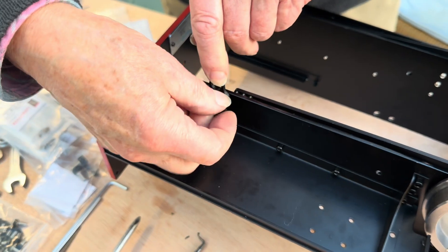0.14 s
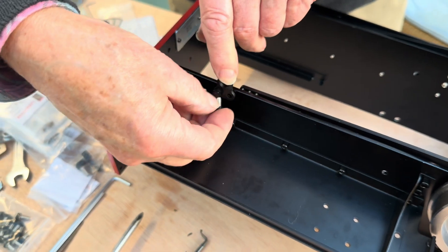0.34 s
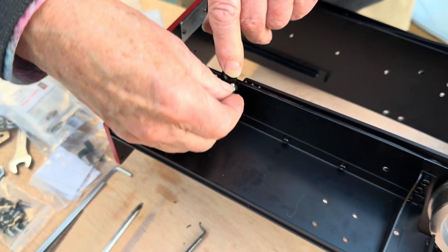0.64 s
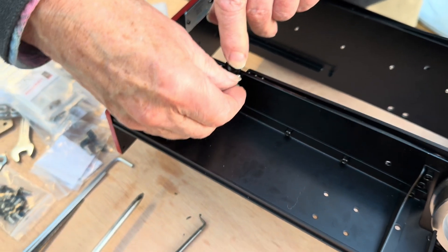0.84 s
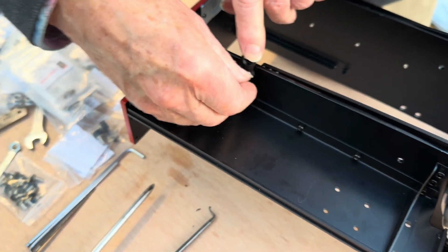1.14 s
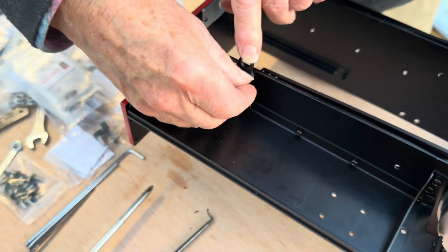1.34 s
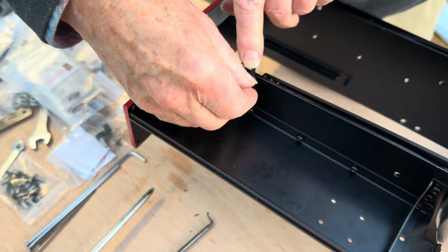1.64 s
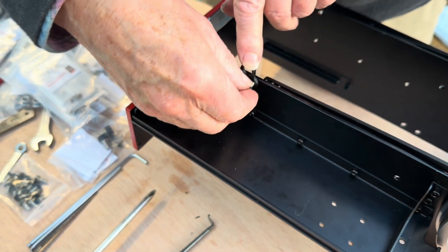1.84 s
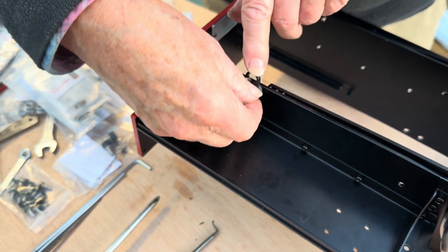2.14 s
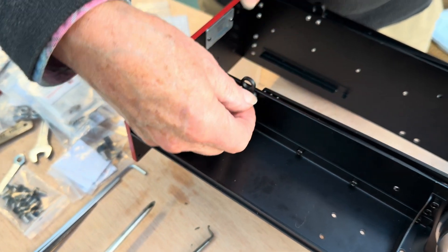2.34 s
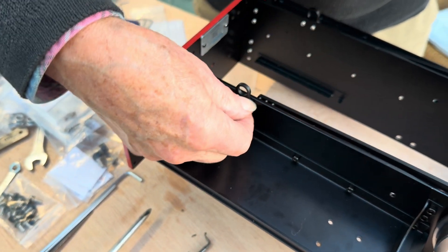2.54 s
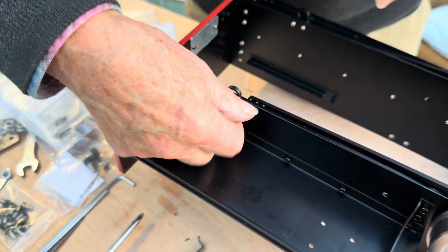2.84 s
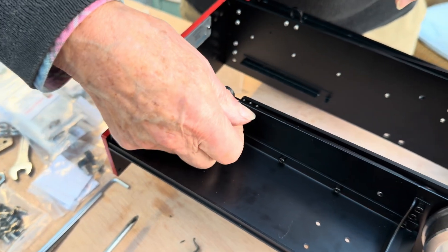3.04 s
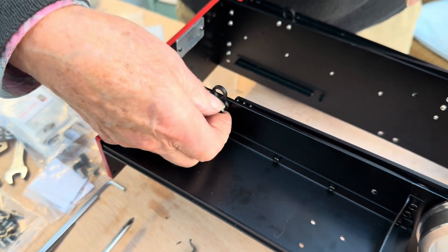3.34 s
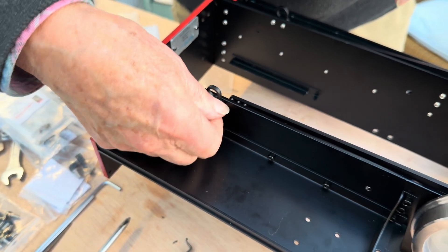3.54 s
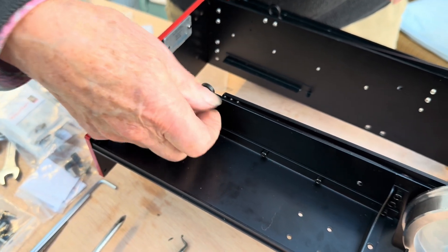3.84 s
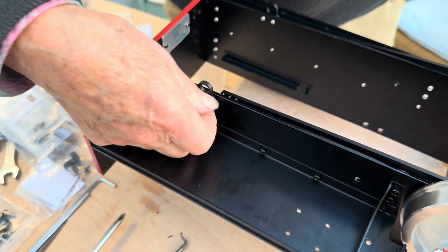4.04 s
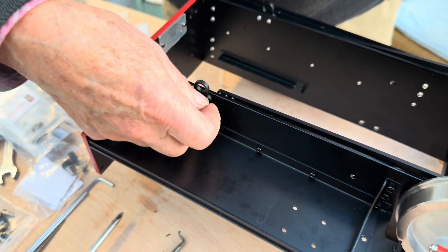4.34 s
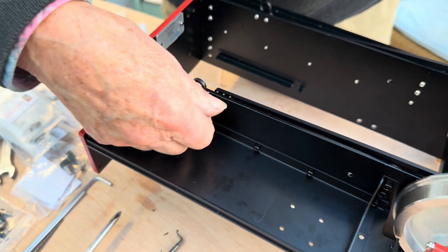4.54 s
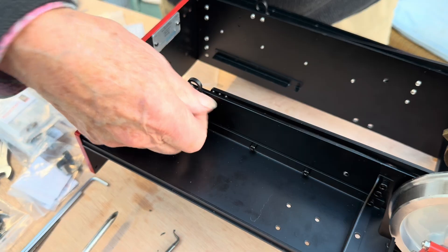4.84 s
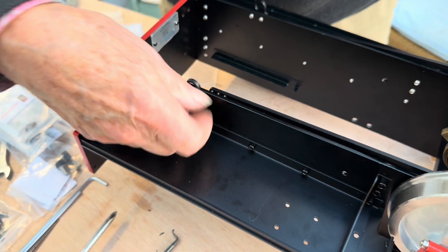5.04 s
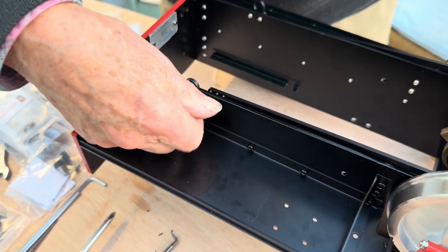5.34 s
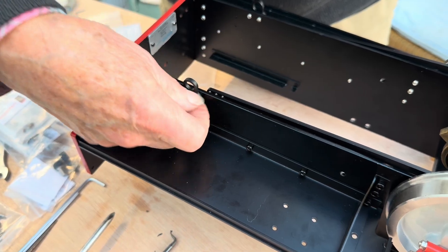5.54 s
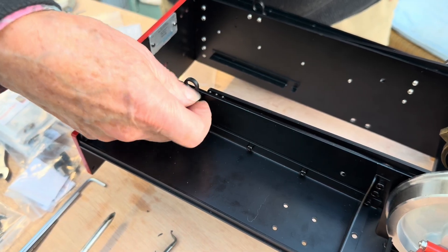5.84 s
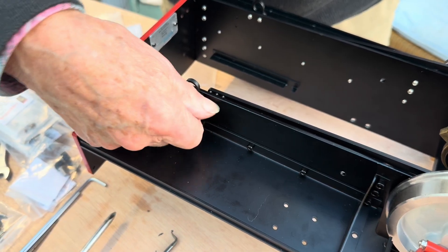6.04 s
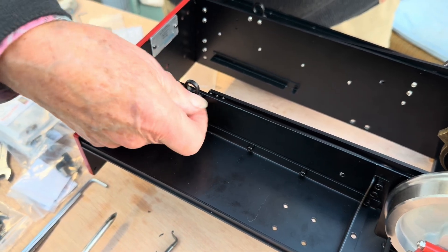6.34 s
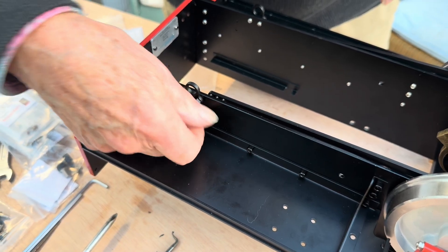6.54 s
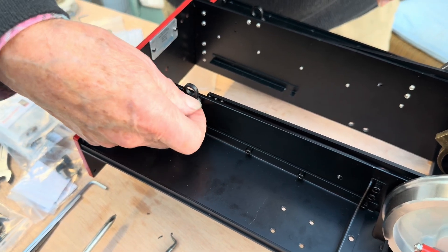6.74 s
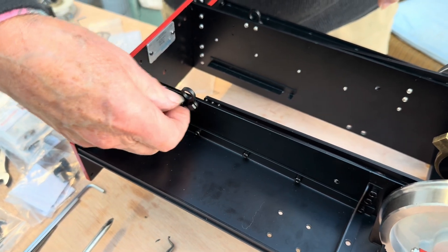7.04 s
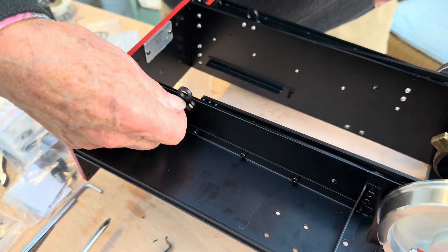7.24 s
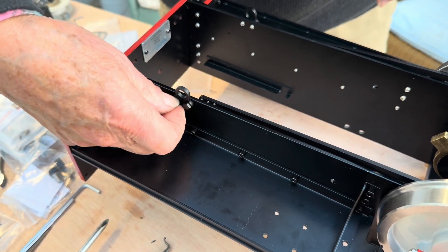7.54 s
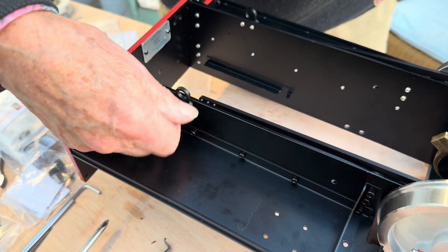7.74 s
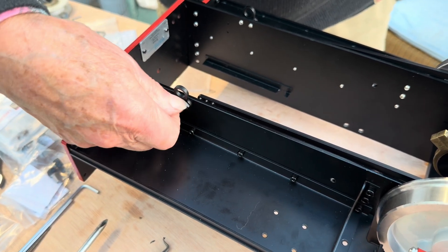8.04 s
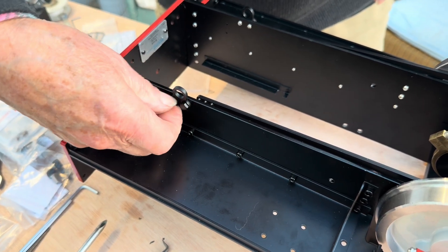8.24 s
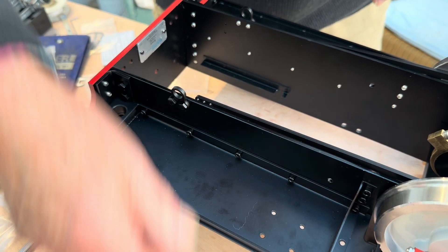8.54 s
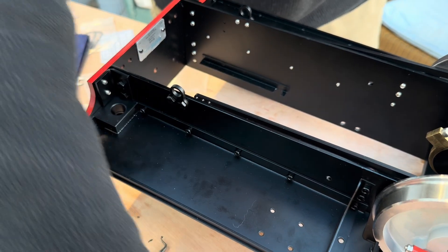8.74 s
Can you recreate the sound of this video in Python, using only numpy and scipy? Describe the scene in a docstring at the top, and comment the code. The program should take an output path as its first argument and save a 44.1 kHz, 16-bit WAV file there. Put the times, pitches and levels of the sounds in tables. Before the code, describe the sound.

A loose metal fitting clinks unevenly against a sheet-steel frame while a nut is tightened by hand, ending with a soft sleeve brush.

```python
"""A workbench in a quiet workshop, a phone's two microphones close to a sheet-steel frame.
Fingers turn a nut onto a bolt, and a loose metal fitting knocks at each turn and rings the frame.
Between knocks the thread scrapes, the nut ticks and the fingers hiss as they slide to a new grip.
The hands bump the frame softly, and at the end a sleeve brushes past the microphones.
Low room rumble and faint microphone hiss lie underneath."""
import sys
import numpy as np
from scipy import signal
from scipy.fft import rfft, irfft, next_fast_len
from scipy.io import wavfile
from scipy.ndimage import uniform_filter1d

SR = 44100
rng = np.random.default_rng(int(sys.argv[2]) if len(sys.argv) > 2 else 0)


def waveform_to_disk(signal):
    """Save audio, clipped to [-1, 1], as 16-bit WAV at the path in sys.argv[1]."""
    frames = np.transpose(np.atleast_2d(signal))
    scaled = np.clip(frames, -1, 1) * 32767
    samples = np.round(scaled).astype(np.int16)
    wavfile.write(sys.argv[1], SR, samples)


N = 392798
TIME = np.arange(N) / SR
RING_SAMPLES, CONTACT_SAMPLES = 32768, 1024
MIC_LAG_S = np.array([[0], [5.6e-5]])  # left, right: the right microphone is further from the bolt

# Knocks of the fitting: start_s, level_db, hardness_db_per_octave, weight_db, rim_clink_db
# (0 in the last three is an ordinary knock)
FITTING_KNOCKS = [(0.166, -61, 14.5, 0, -8), (0.5322, -43, -4.5, 6.5, -2), (0.9707, -37, -10, 3, 0),
                  (1.139, -35, -6, 4, -1), (1.1641, -37, -10.5, 4, -1), (1.1938, -38, -6, 4, -1),
                  (1.6665, -52, 3.5, 7, 4.5), (2.1118, -24.5, 4.0, 6, -3), (2.175, -25, -1.5, -1, -2),
                  (2.2782, -46, -8.5, 12.5, -2), (2.367, -44.5, -5, 13.5, -2.5), (2.511, -54, -8.5, 8, -8),
                  (2.5463, -35.5, -3.5, 2.5, -6.5), (2.555, -30.5, -11.5, 4, -9), (2.59, -35, -1, 2.5, 2),
                  (2.6312, -43, -5, 5.5, 2.5), (2.6815, -42, -6, 5.5, 1), (2.7224, -49, -10.5, 10, -2.5),
                  (2.8796, -42.5, 0.5, 10.5, -2.5), (2.9365, -49, 0.5, 8, 7),
                  (3.197, -54.5, -2.5, 0.5, -4.5), (3.2245, -44.5, -6.5, 6, 1.5),
                  (3.237, -41, -14, 4, -5.5), (3.2969, -28.5, -0.5, -3, 4.5), (3.3983, -32.5, -2, 5.5, 4.5),
                  (3.4136, -37, -5, 7, 6.5), (3.432, -39.5, -6.5, 1.5, -4), (3.524, -43.5, 0.5, 10, 6.5),
                  (3.572, -48.5, 2.5, 13.5, 7.5), (3.7247, -38.5, 0.5, -0.5, 3),
                  (3.7969, -36.5, 0, -0.5, 0.5), (3.8116, -36.5, 1.5, 8.5, 4.5),
                  (3.8452, -32, 0.0, 4.5, 5.5), (3.9923, -47.5, -3.5, 13, 2.5), (4.0596, -35, -7, -5, -2),
                  (4.075, -34, -2, 7, 2), (4.1773, -52.5, 2.5, 9.5, 6), (4.2783, -41.5, -5, 11, 3),
                  (4.315, -48, -8.5, 5.5, -2.5), (4.4331, -45.5, -10, 2.5, -6), (4.456, -35, -6, -5, -1.5),
                  (4.4802, -24.5, 2.0, 4, 2.5), (4.575, -36, 1.5, 4.5, 0.5), (4.668, -41.5, -1, 9, 3),
                  (4.6798, -34.5, 1.5, 6.5, 4.5), (4.8268, -43, -3, 5, -1.5), (4.8495, -45.5, 1.5, 13, 0.5),
                  (4.9534, -41, -2.0, 1.5, -2), (4.9658, -41, 2.5, 9, 5), (5.049, -39, 0.5, -1, -0.5),
                  (5.082, -24.5, 3.5, 3.5, 6.5), (5.214, -38, 5.5, 6.5, 8), (5.3395, -41, 3, 0, -2),
                  (5.449, -20, -0.5, -2, -3), (5.5077, -32, -5.5, 4, -5.5), (5.5337, -24, -4, 0.5, 0),
                  (5.676, -43.5, 1, -4.5, 2.5), (5.7003, -41, 1, -2, -0.5), (5.8234, -28, 1.0, -1.5, -1.5),
                  (5.829, -23.5, 1, 3.5, 0), (5.893, -47.5, -1.5, 6, 0), (5.9689, -49.5, -4.5, 9.5, -3.5),
                  (6.026, -52, -2, -1, 9.5), (6.0846, -40, 3.5, 3.5, 0), (6.195, -21, 6, 8, 4.5),
                  (6.2896, -42.5, -2.5, 2.5, -7), (6.3518, -27, 1, 6, -3), (6.4917, -42.5, -1, 3, -1.5),
                  (6.6224, -28.5, -1.5, 1, 0), (6.6498, -28.5, -1, -6.5, -0.5), (6.748, -50.5, -6, -1, 1),
                  (6.7837, -36.5, 5.5, 1.5, 0), (7.015, -63, -11, 11, -5.5), (7.1162, -55.5, -9, 14, -10),
                  (7.1803, -52, 4.5, 16, -2.5), (7.4809, -62.5, -2, 10.5, 7), (7.8602, -36, 7.0, 13.5, 1.5),
                  (7.9341, -54.5, -3, 16.5, 0), (7.9803, -43, 4, 8.5, 13.5),
                  (8.1265, -64.5, -5.5, 14.5, 0.5), (8.2679, -63, -13, 12, -13.5)]
# Modes that stand out: a beating pair of the panel, the clack of the fitting, a thin ping
PANEL_HZ, PANEL_TWIN_HZ, CLACK_HZ, CLACK_TWIN_HZ, PING_HZ = 1104, 1137, 1909, 2019, 2811
# Main modes of frame and fitting: pitch_hz, level_db, t60_s, left_minus_right_db
FRAME_MODES = [(496, -29, 0.5935, -2), (565, -28, 0.4232, 4), (966.5, -24.5, 0.2667, -10),
               (PANEL_HZ, -15, 0.3786, -6), (PANEL_TWIN_HZ, -13.5, 0.30474, -6.5),
               (1264.5, -17.5, 0.1621, -6.5), (1314.5, -28.5, 0.2385, -16.5), (1515, -18.5, 0.2585, 5.5),
               (1629.5, -10.5, 0.1398, 6), (1737.5, -8.5, 0.0726, -17), (1862, -7, 0.1281, -7.5),
               (CLACK_HZ, -9, 0.078, 5.1), (CLACK_TWIN_HZ, -1.1, 0.11957, -7.5), (2099, -2.5, 0.1236, -2),
               (2209, -6, 0.1286, -2), (2539, -8.5, 0.1462, -1), (PING_HZ, -11, 0.1382, -1.4),
               (3314, -20, 0.0798, -1), (3771, -25, 0.3821, 2), (3961.5, -10, 0.1012, -2),
               (4511, -18.5, 0.1717, -9.5), (5190, -20.5, 0.0097, -2), (6501, -22, 0.1101, -9.5),
               (6716.5, -13, 0.134, 4.5), (7506, -37.5, 0.2882, -17), (8659, -24.5, 0.155, 9),
               (10956, -44.5, 0.1693, -12.5), (14193.5, -22.5, 0.0019, 5)]
# The crowd of weaker sheet modes: pitch_hz, level_db, t60_s
SHEET_MODES = [(307, -26.5, 0.57), (599.93, -7, 0.12), (878.2, -23, 0.09), (1317.2, -10.5, 0.29),
               (1850.3, 0.5, 0.063), (2198, -5.5, 0.1315), (4117.8, -13, 0.20896), (6640, -10.5, 0.13652),
               (7488.6, -14.5, 0.05503), (11016, -23, 0.025), (14640, -36, .08)]
# First crack of a contact: frequency_hz, level_db
CRACK_SPECTRUM = [(600, -23.5), (1300, -3.5), (1950, 13), (2700, -4), (4500, 0.5), (6800, 3), (8500, -1),
                  (12000, -14.5), (14500, -9.5)]
# Effort of the turning hand: time_s, scrape_db, hum_db
HAND_EFFORT = [(0.0, -93.5, -76), (0.43, -86.5, -78), (1.1, -68.5, -70), (1.46, -91.5, -75.5),
               (2.11, -90, -75), (2.23, -73, -71), (2.44, -74, -67), (2.99, -74, -70.5), (3.42, -63, -67.5),
               (3.64, -66.5, -70), (4.96, -71, -70.5), (5.48, -65, -67), (6.06, -67, -73),
               (6.59, -62.5, -68), (6.9, -78, -66.5), (7.5, -73.5, -72), (7.86, -73, -68.5),
               (8.6, -83, -73.5)]
# Fingers slide to a new grip and lean on the frame: middle_s, length_s, scrape_db, hiss_db, hum_db
GRIP_SLIDES = [(0.205, 0.0253, -66, -90, -81), (0.288, 0.0326, -69, -94, -78.5),
               (0.838, 0.0324, -66, -81, -72.5), (1.12, 0.022, -62, -76, -76),
               (1.199, 0.08047, -69, -87, -61), (1.44, 0.05, -68, -94, -82),
               (1.79, 0.0337, -78.5, -100, -64.5), (2.075, 0.035, -64, -95, -80.5),
               (2.429, 0.08606, -84.5, -77, -66), (2.579, 0.07977, -60, -69, -58.5),
               (2.799, 0.0877, -77.5, -96.5, -70), (3.118, 0.1433, -67.5, -95, -70.5),
               (3.373, 0.1274, -66, -73.5, -62), (3.991, 0.0997, -63.5, -85, -76),
               (4.523, 0.0667, -59, -64, -72), (5.244, 0.06286, -79.5, -67, -55),
               (5.428, 0.008, -54, -80, -72), (5.991, 0.06764, -71, -67.5, -62.5),
               (6.277, 0.0771, -58.5, -70, -70.5), (6.81, 0.161, -75, -69, -60),
               (7.192, 0.06617, -65, -68, -58), (7.311, 0.03812, -71.5, -61, -72),
               (7.61, 0.04279, -60, -58, -63.5), (7.697, 0.03658, -70.5, -76.5, -66.5),
               (7.97, 0.05494, -60.5, -58.5, -62.5), (8.348, 0.0832, -64, -67, -60)]
# Rumble of the handled frame: frequency_hz, level_db
HANDLING_SPECTRUM = [(50, -15.5), (110, -2.5), (145, -11.5), (164, 0.5), (180, -6.5), (215, -4), (234, 5.5),
                     (255, -8.5), (400, -13), (700, -20), (1500, -41)]
# Soft brushes of hand and sleeve: start_s, thump_db, decay_s, rustle_db
SLEEVE_BRUSHES = [(8.645, -49, 0.00824, -67), (8.721, -38.5, 0.007988, -49), (8.732, -39.5, 0.02676, -57),
                  (8.790, -42, 0.04066, -62), (8.858, -55.5, 0.1386, -63)]
# Dry ticks as the arm withdraws: start_s, level_db
SLEEVE_TICKS = [(8.71, -42.5), (8.772, -32), (8.785, -46), (8.876, -48)]
# Room tone and microphone hiss: frequency_hz, level_db
ROOM_SPECTRUM = [(25, -5), (40, 6), (75, -2), (115, -5.5), (220, -20.5), (400, -38), (800, -36),
                 (2500, -36.5), (7000, -70.5), (11000, -72), (14500, -65.5), (16000, -51.5)]


def fitting_knocks(ring, level_db=1.2, lead_s=.0007, contact_s=.0013, pivot_hz=2535.6, top_hz=10987):
    """Close up, the fitting strikes: hard knocks are bright, heavy ones ring the panel, the rim clinks."""
    out = np.zeros((2, N))
    for start_s, db, hardness, weight_db, clink_db in FITTING_KNOCKS:
        tilt = lambda hz: hardness * np.log2(hz / pivot_hz)
        panel = [(600, weight_db - 4), (1150, weight_db - 4), (1600, 0), (2200, 0)]
        rim = [(2750, clink_db - 1), (3900, clink_db + 2)]
        treble = [(5000, tilt(5000)), (7000, tilt(7000) + 1),
                  (top_hz, tilt(top_hz) - 2), (14000, tilt(top_hz) + 3)]
        length_s = contact_s * 2 ** (-hardness / 20)  # harder contacts are shorter
        force = colour(contact_force(length_s), panel + rim + treble)
        knock = drive(ring, force)
        power = uniform_filter1d((knock ** 2).mean(axis=0), size=132)  # over 3 ms
        peak = np.sqrt(2 * power.max())
        add(out, start_s - lead_s - CONTACT_SAMPLES / 2 / SR, knock * undb(db + level_db) / peak)
    return out


def contact_force(length_s, slide_db=-17, slide_s=0.002996, evenness=0.27):
    """One contact: a faint slide as the play is taken up, then a few milliseconds of tiny rebounds."""
    t = (np.arange(CONTACT_SAMPLES) - CONTACT_SAMPLES // 2) / SR
    age = np.maximum(t, 0) / length_s
    rebounds = age ** 2 * np.exp(2 - 2 * age)
    slide = undb(slide_db) * np.exp(np.minimum(t, 0) / slide_s - age)
    force = rfft(rng.standard_normal(CONTACT_SAMPLES) * (rebounds + slide))
    # hard faces push all frequencies about equally; the remaining unevenness colours each knock
    power = uniform_filter1d(np.abs(force) ** 2, size=7)
    return irfft(force / power ** (evenness / 2))


def frame_ring(sheet_db=-5, crack_db=-5, scatter=0.8686):
    """One sharp contact as both microphones hear it: main modes, weak sheet modes and a crack."""
    t = np.arange(RING_SAMPLES) / SR
    age = np.maximum(t - MIC_LAG_S, 0)
    sides = np.array([[.5], [-.5]])
    modes = 0
    for k, (hz, db, t60, pan_db) in enumerate(FRAME_MODES):
        # neighbours start in opposite phase, so close pairs swell and beat
        phase = np.pi * k + scatter * hz / 2000 * rng.standard_normal() * sides
        decay = np.exp(-np.log(1000) * age / t60)
        modes += undb(db + pan_db * sides) * np.sin(2 * np.pi * hz * age + phase) * decay
    crack = colour(np.sinc((t - MIC_LAG_S) * SR - 4), CRACK_SPECTRUM)
    return unit(modes) + undb(sheet_db) * unit(sheet_ring(t)) + undb(crack_db) * unit(crack)


def sheet_ring(t, diffuse_db=4):
    """The steel sheet's crowded modes die away as bands of noise, part direct, part diffuse."""
    f = np.fft.rfftfreq(RING_SAMPLES, 1 / SR)
    direct = rfft(rng.standard_normal(RING_SAMPLES)) * np.exp(-2j * np.pi * f * MIC_LAG_S)
    diffuse = rfft(rng.standard_normal((2, RING_SAMPLES))) * undb(diffuse_db)
    edges_hz = np.geomspace(250, 17000, 25)
    sheet = 0
    for lo, hi in zip(edges_hz, edges_hz[1:]):
        hz = np.sqrt(lo * hi)
        band = irfft((direct + diffuse) * ((f >= lo) & (f < hi)))
        decay = np.exp(-np.log(1000) * t / at_hz(hz, SHEET_MODES, column=2))
        sheet += unit(band * decay) * undb(at_hz(hz, SHEET_MODES)) * np.sqrt(hi - lo)
    return sheet


def finger_damping(ring, above_hz=7200, damp_s=0.033):
    """Fingers on the fitting damp its highest rings."""
    treble = signal.sosfiltfilt(signal.butter(8, above_hz, "high", fs=SR, output="sos"), ring)
    return ring - treble * (1 - np.exp(-np.arange(RING_SAMPLES) / SR / damp_s))


def thread_scrape(ring, turning_db=-3, uneven_db=3):
    """The nut catches and slips on the thread: a dense run of tiny contacts into the frame."""
    slips = impulses(per_s=420, spread_db=5) * rng.choice([-1, 1], N)
    slips *= undb(uneven_db * wander(rate_hz=22))
    slips = colour(slips, [(500, 7), (1100, 5.5), (2000, -6), (3000, -2), (7000, -18.5), (14000, -29)])
    effort = effort_gain(column=1) * undb(turning_db) + slide_gain(column=2) + fitting_drag()
    # effort shapes the force, so the frame rings on after the fingers stop
    return drive(ring, slips * effort) / drive(ring, slips).std()


def fitting_drag(drag_db=-35, rise_s=.0075, fall_s=0.0527, approach_db=-23, approach_s=0.007858):
    """Gain over time as the fitting scrapes up to each knock, drags on the thread and comes to rest."""
    jolts = np.zeros(N)
    for start_s, db, *_ in FITTING_KNOCKS:
        jolts[int(start_s * SR)] += undb(db)
    fade = lambda x, time_s: signal.lfilter([1], [1, -np.exp(-1 / (time_s * SR))], x)
    approach = fade(jolts[::-1], approach_s)[::-1]
    drag = fade(jolts, fall_s) - fade(jolts, rise_s)
    return undb(approach_db) * approach + undb(drag_db) * drag


def nut_ticks(ring, gain_db=13):
    """The loose nut ticks faintly at random, louder as the hand works harder."""
    taps = impulses(per_s=14, spread_db=3) * effort_gain(column=1)
    tick = colour(ring, [(600, -1), (1150, -4.5), (2000, -4), (4000, -12), (9000, -16)])
    return drive(tick / np.abs(tick).max(), taps) * undb(gain_db)


def fingertips(turning_db=-15, grain_db=4):
    """Skin slides over the nut and the paint with a grainy hiss."""
    grain = stereo_noise(apart_hz=5007.3) * undb(grain_db * wander(rate_hz=360))
    hiss = colour(grain, [(1000, -12.5), (2500, 0), (4000, 2), (7000, 4.5),
                          (9000, -9.5), (12000, -5), (14500, 5)])
    return unit(hiss) * (effort_gain(column=1) * undb(turning_db) + slide_gain(column=3))


def handling(rest_db=2, bench_rest_db=3, bench_lean_db=-3, uneven_db=2):
    """The hands press and shift on the frame: its low modes hum and the bench rumbles."""
    push = stereo_noise(apart_hz=791) * undb(uneven_db * wander(rate_hz=16))
    hum = unit(colour(push, HANDLING_SPECTRUM))
    bench = shaped_noise([(25, -5.5), (40, 7), (55, 1.5), (78, 7.5), (120, -4.5), (250, -43.5)],
                         apart_hz=1983)
    resting = effort_gain(column=2) * undb(rest_db)
    leaning = slide_gain(column=4)
    bench_gain = np.hypot(resting * undb(bench_rest_db), leaning * undb(bench_lean_db))
    return hum * np.hypot(resting, leaning) + bench * bench_gain


def sleeve(rise_s=0.002052, tick_s=0.0016734, boom_hz=160, boom_db=1, thud_db=-4):
    """Cloth passes right by the microphones: hollow thumps, a little rustle and a few dry ticks."""
    thud = shaped_noise([(40, -8.5), (110, 4), (165, -2), (260, -5), (450, -10),
                         (1000, -29.5), (3000, -48.5)], apart_hz=906)
    rustle = shaped_noise([(300, 1), (1000, 3.5), (3000, -3), (8000, -9.5), (15000, -19)],
                          apart_hz=1504.8)
    snap = shaped_noise([(1000, -2), (2400, -20.5), (3100, 7.5), (4500, -15.5), (6500, 2),
                         (9000, -16.5), (14000, -7.5)], apart_hz=3000)
    out = np.zeros((2, N))
    for start_s, thump_db, decay_s, rustle_db in SLEEVE_BRUSHES:
        age = np.maximum(TIME - start_s, 0)
        envelope = np.minimum(age / rise_s, 1) * np.exp(-age / decay_s)
        thump = undb(thud_db) * thud - undb(boom_db) * np.sin(2 * np.pi * boom_hz * age)
        out += envelope * (undb(thump_db) * thump + undb(rustle_db) * rustle)
    for start_s, db in SLEEVE_TICKS:
        age = np.clip((TIME - start_s) / tick_s, 0, 50)
        out += age * np.exp(-age) * undb(db) * snap
    return out


def room_tone(level_db=-66, swell_db=1):
    """Low workshop rumble and faint microphone hiss, gently swelling."""
    return shaped_noise(ROOM_SPECTRUM, apart_hz=1200) * undb(level_db + swell_db * wander(rate_hz=2))


def top_hiss(level_db=-88):
    """A thin steady hiss at the very top, the same left and right."""
    spectrum = [(10000, -30.5), (12000, -17.5), (13300, -1.5), (14500, 0.5), (16000, 0.5), (17500, -30)]
    return unit(colour(rng.standard_normal(N), spectrum)) * undb(level_db)


def effort_gain(column):
    """Gain over time from one dB column of the hand's effort."""
    rows = np.array(HAND_EFFORT)
    return undb(np.interp(TIME, rows[:, 0], rows[:, column]))


def slide_gain(column):
    """Gain over time from one dB column of the slides, each a smooth swell."""
    return sum(undb(row[column]) * np.exp(-2 * ((TIME - row[0]) / row[1]) ** 2) for row in GRIP_SLIDES)


def drive(ring, force):
    """Every sample of the force sets off the ring at both microphones."""
    return signal.fftconvolve(ring, force[None], axes=1)[:, :N]


def impulses(per_s, spread_db):
    """Tiny contacts at random times and strengths."""
    return (rng.random(N) < per_s / SR) * undb(spread_db * rng.standard_normal(N))


def wander(rate_hz):
    """Random drift, spread near 1."""
    knots = rng.standard_normal(N // 100)
    return np.interp(TIME * rate_hz, np.arange(len(knots)), knots)


def stereo_noise(apart_hz):
    """Noise at two close microphones: alike in the bass, unrelated higher up."""
    mid, difference = rng.standard_normal((2, N))
    side = signal.sosfilt(signal.butter(1, apart_hz, "high", fs=SR, output="sos"), difference)
    return np.array([mid + side, mid - side])


def shaped_noise(spectrum, apart_hz):
    """Coloured stereo noise at rms 1."""
    return unit(colour(stereo_noise(apart_hz), spectrum))


def colour(x, spectrum):
    """Minimum-phase filter through points of frequency_hz, level_db."""
    n = next_fast_len(x.shape[-1], real=True) * 2
    gain = undb(at_hz(np.arange(n // 2 + 1) * SR / n, spectrum))
    cepstrum = irfft(np.log(gain))
    cepstrum[1:n // 2] *= 2
    cepstrum[n // 2 + 1:] = 0
    return irfft(rfft(x, n) * np.exp(rfft(cepstrum)))[..., :x.shape[-1]]


def at_hz(hz, table, column=1):
    """Read a table column on a log-frequency axis."""
    rows = np.array(table)
    return np.interp(np.log(hz + 1), np.log(rows[:, 0]), rows[:, column])


def add(out, start_s, sound):
    """Mix a sound in at a time."""
    start = max(int(start_s * SR), 0)
    part = sound[..., :max(N - start, 0)]
    out[:, start:start + part.shape[-1]] += part


def undb(db):
    """Decibels to gain."""
    return 10 ** (np.asarray(db) / 20)


def unit(x):
    """Scale to rms 1."""
    return x / np.sqrt(np.mean(x ** 2))


def scene():
    """Up front, knocks, thread and ticks share one frame; hands, sleeve and room lie beneath."""
    ring = finger_damping(frame_ring())
    metal = fitting_knocks(ring) + thread_scrape(ring) + nut_ticks(ring)
    return metal + fingertips() + handling() + sleeve() + room_tone() + top_hiss()


def record(dry, low_cut_hz=22, high_cut_hz=16000):
    """The phone cuts the deepest bass and the top."""
    dry = signal.sosfilt(signal.butter(2, low_cut_hz, "high", fs=SR, output="sos"), dry)
    return signal.sosfilt(signal.ellip(8, .2, 70, high_cut_hz, fs=SR, output="sos"), dry)


dry = scene()
out = record(dry)
waveform_to_disk(out)
```